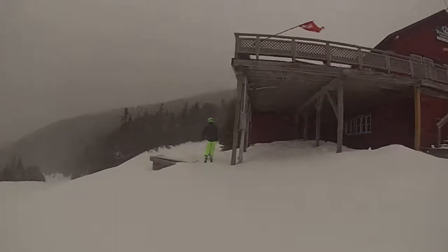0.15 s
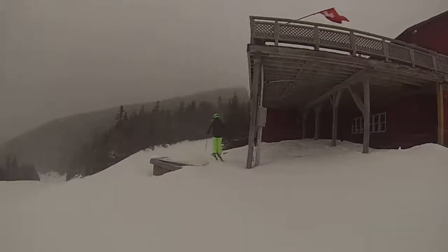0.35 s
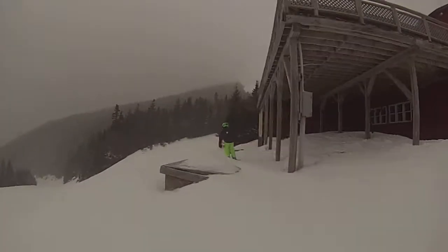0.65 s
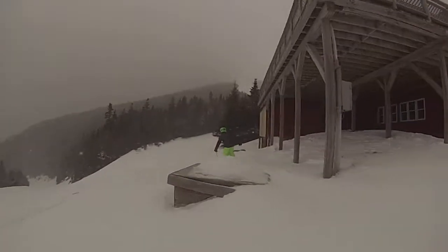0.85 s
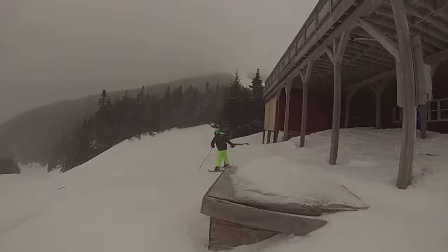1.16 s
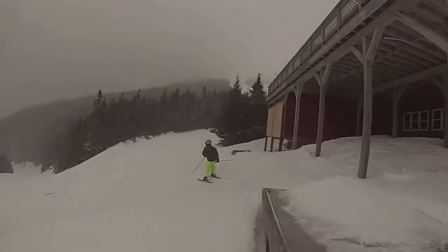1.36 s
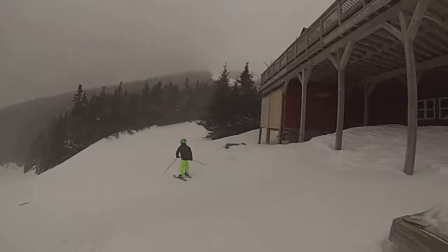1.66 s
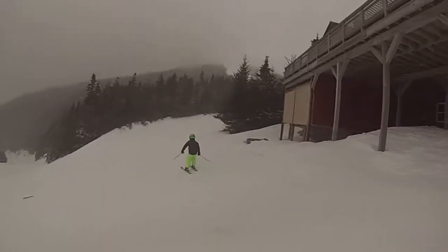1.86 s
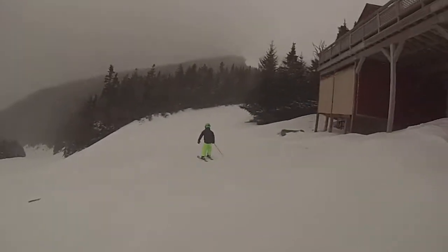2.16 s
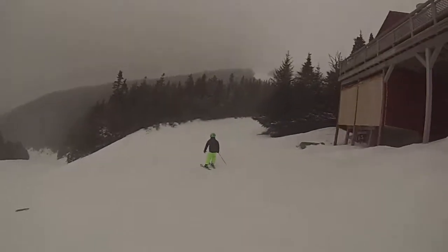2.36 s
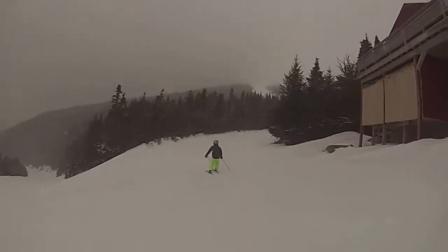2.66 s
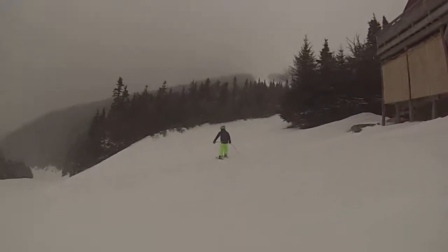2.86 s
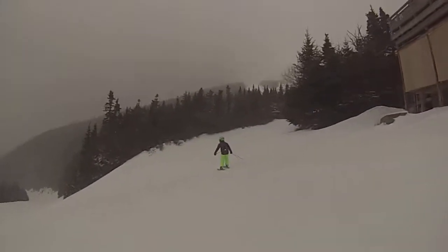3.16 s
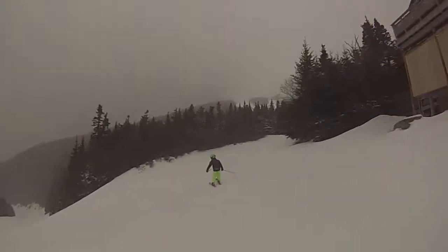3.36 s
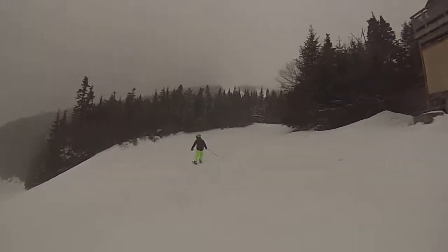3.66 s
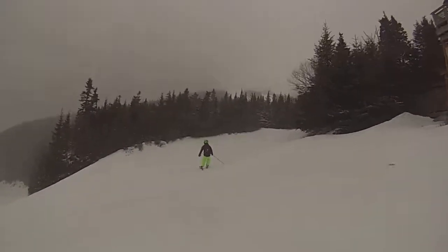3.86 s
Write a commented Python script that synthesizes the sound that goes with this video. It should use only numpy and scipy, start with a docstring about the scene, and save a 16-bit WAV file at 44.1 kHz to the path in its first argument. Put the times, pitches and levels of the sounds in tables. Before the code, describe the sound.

Two coarse ski scrapes on icy snow with crunching lumps and fine spray, separated by a lull, then scattered crisp ticks over soft wind rumble; close, boxy, mono sound from inside a hard case on an open slope.

```python
"""Skis on crusty snow, heard from inside a case

By a lodge, a skier glides past a microphone sealed in a case. Wind rumbles as low tones over shaped noise,
and whistles faintly as a wandering sine. Ice grains tick on the case: clicks ringing short modes.
The skis scrape loudly in two turns: dense random clicks ring the case resonances, with bursts for breaking
lumps of crust, a dull hiss, the singing of a flat glide and a fine bright spray of snow."""
import sys
import numpy as np
from scipy import signal
from scipy.fft import rfft, irfft
from scipy.io import wavfile
from scipy.ndimage import uniform_filter1d

SR = 44100
rng = np.random.default_rng(int(sys.argv[2]) if len(sys.argv) > 2 else 0)


def materialize(psi):
    """Save the field psi as 16-bit PCM at rate SR to the path in sys.argv[1].

    A 1-D psi becomes a single channel; in a 2-D psi each row is a channel.
    """
    bounded = np.clip(np.atleast_2d(psi).T, -1, 1)
    quanta = np.round(bounded * 32767).astype(np.int16)
    wavfile.write(sys.argv[1], SR, quanta)


N = 176400  # 4 s
T = np.arange(N) / SR


def amp(db):
    """dB to gain."""
    return 10 ** (np.asarray(db) / 20)


def rms_one(x):
    """Scale to rms 1."""
    return x / np.sqrt(np.mean(x ** 2) + 1e-20)


def in_time(rows):
    """Columns of a table, after its times, as curves over all samples."""
    s, *columns = np.transpose(rows)
    return [np.interp(T, s, column) for column in columns]


def drift(hz):
    """Slow random wander, rms 1: noise through two equal low-pass poles at hz."""
    r = np.exp(-2 * np.pi * hz / SR)
    noise = rng.standard_normal(N + SR)
    return rms_one(signal.lfilter([1], [1, -2 * r, r * r], noise)[SR:])  # the first second settles the filter


def wavering(hz, waver_hz, rate_hz):
    """A tone of rms 1 whose pitch wanders by waver_hz rms."""
    cycles = np.cumsum(hz + waver_hz * drift(rate_hz)) / SR
    return np.sqrt(2) * np.sin(2 * np.pi * cycles + rng.uniform(0, 2 * np.pi))


def resonate(x, hz, width_hz):
    """One two-pole resonance, gain about 1 at its peak."""
    r = np.exp(-np.pi * width_hz / SR)
    poles = [1, -2 * r * np.cos(2 * np.pi * hz / SR), r * r]
    return signal.lfilter([(1 - r * r) / 2, 0, (r * r - 1) / 2], poles, x + 1e-18)


PATCH_HZ = 45  # corner of the flicker


def case(x, table, patch_db=0):
    """Parallel resonances with alternating signs, each flickering on its own by patch_db rms."""
    out = np.zeros(len(x))
    for k, (hz, width_hz, db) in enumerate(table):
        flicker_db = patch_db * drift(PATCH_HZ) if patch_db else 0
        out += (-1) ** k * amp(db + flicker_db) * resonate(x, hz, width_hz)
    return out


def grains(per_s, spread_db, top=3.6):
    """Random clicks, rms 1 overall; sizes in dB are exponential, capped at top times spread_db."""
    sizes = amp(spread_db * np.minimum(rng.exponential(1, N), top)) * rng.choice([-1, 1], N)
    return rms_one(sizes * (rng.random(N) < per_s / SR))


# colour of the wind rush: f/Hz, relative spectral level/dB
RUSH_COLOUR = [(8, -28), (20, -1.5), (45, -6), (62, -7.5), (80, -16), (110, -19.5), (200, -23.5),
               (340, -30), (570, -31.5), (1100, -38.5), (1450, -44)]
# gusts on the microphone port: t/s, rush level/dB within 115-300 Hz
GUSTS = [(0.0, -59), (0.02, -60.5), (0.63, -64), (0.76, -52), (1.08, -60), (1.16, -53), (1.2, -65.5),
         (1.71, -60.5), (1.74, -63.5), (1.95, -54.5), (2.27, -62), (2.49, -56), (3.11, -57.5),
         (3.25, -59.5), (3.9, -60.5), (4.0, -56)]


def wind_rush():
    """A lumpy rush at the microphone port: noise shaped in frequency, its level following the gusts."""
    (gust_db,) = in_time(GUSTS)
    hz, db = np.transpose(RUSH_COLOUR)
    bins = np.arange(N // 2 + 1) * SR / N
    colour_db = np.interp(np.log(bins + 1), np.log(hz), db, right=-80)
    spectrum = rfft(rng.standard_normal(N)) * amp(colour_db)
    reference_rms = np.std(irfft(spectrum * (bins > 115) * (bins < 300), N))
    return irfft(spectrum, N) / reference_rms * amp(gust_db + drift(13))


# wind buffeting the case: t/s, throb level/dB, hum level/dB
BUFFETS = [(0.0, -51.5, -50), (0.2, -45.5, -85), (0.23, -38, -77), (0.29, -40, -61), (0.44, -40, -71),
           (0.49, -50, -53), (0.59, -33.5, -65), (0.62, -56, -58), (0.8, -32.5, -58), (0.92, -57, -46.5),
           (1.0, -35.5, -49.5), (1.19, -48, -69), (1.26, -52, -55.5), (1.83, -39.5, -62.5),
           (1.94, -35.5, -51.5), (2.32, -50.5, -66), (2.39, -46, -49), (2.47, -42.5, -60), (2.64, -45, -55),
           (2.78, -38, -64.5), (3.03, -59, -44.5), (3.25, -39, -74), (3.29, -65, -70), (3.35, -41, -61),
           (3.68, -54, -64), (3.72, -47, -62), (3.77, -66, -77), (3.8, -68, -71.5), (3.95, -36, -57),
           (4.0, -42, -51)]
THROB_HZ, THROB_WAVER_HZ, HUM_HZ, HUM_WAVER_HZ = 39, 5, 97, 7


def wind_buffeting():
    """Two low tones of wandering pitch and level as wind buffets the case."""
    throb_db, hum_db = in_time(BUFFETS)
    throb = wavering(THROB_HZ, THROB_WAVER_HZ, 5.07) * amp(throb_db + 0.58 * drift(31.0))
    hum = wavering(HUM_HZ, HUM_WAVER_HZ, 8.8) * amp(hum_db + 1.6 * drift(15))
    return throb + hum


# faint wind whistle: t/s, f/Hz, level/dB
WHISTLE = [(2.4, 520, -80), (2.52, 545, -62), (2.7, 580, -61), (2.98, 675, -62), (3.1, 620, -67),
           (3.25, 585, -62.5), (3.42, 540, -64), (3.56, 455, -67), (3.65, 450, -85), (3.85, 560, -80),
           (4.0, 600, -60)]
WHISTLE_WAVER_HZ, WHISTLE_BREATH_HZ = 16, 45  # pitch wander; corner of the breathy level wander


def wind_whistle():
    """A gliding tone, its pitch and level blurred by breath."""
    hz, db = in_time(WHISTLE)
    breath = rms_one(1.6 + drift(WHISTLE_BREATH_HZ))
    return amp(db) * breath * wavering(hz, WHISTLE_WAVER_HZ, 25)


# one short squeak: start t/s, end t/s, f/Hz, level/dB, octave level/dB relative to the fundamental
SQUEAK = (3.312, 3.388, 6420, -63, -18)


def squeak():
    """A thin tone and its octave, faded in and out, with a slightly unsteady pitch."""
    start, end, pitch_hz, level_db, octave_db = SQUEAK
    phase = 2 * np.pi * np.cumsum(pitch_hz + 30 * drift(40)) / SR
    gate = np.clip(np.minimum(T - start, end - T) / 0.0072, 0, 1)  # 7.2 ms fades
    tone = np.sin(phase) + amp(octave_db) * np.sin(2 * phase)
    return np.sqrt(2) * amp(level_db) * gate * tone


# ice grains hitting the case: t/s, strike level/dB (before a common trim),
# low ring level/dB, high ring level/dB (both count relative to their mean over the table)
TICKS = [(0.0769, -26.5, 3.5, -15.5), (0.1026, -36, 1, -7.5), (0.1271, -35, -13, -21),
         (0.3, -29.5, -3, -12), (0.3378, -29.5, -15, -27), (0.383, -45, -1, -3), (1.1467, -37, -1, -19),
         (1.435, -37, -17, -23), (1.622, -48, -20, -8), (1.646, -47, -20, -8), (1.6644, -33.5, 13, -24),
         (1.681, -42, -20, -10), (1.726, -40, -20, -15), (1.749, -54, -20, -8), (1.788, -43, -15, -16),
         (1.816, -50, -20, -8), (1.839, -46, -20, -6), (1.866, -30.5, -17, -20), (1.878, -52, -20, -7),
         (1.844, -30, -12, -15), (1.962, -38, 0, -27), (1.9866, -55, -25, -8), (2.0003, -34, -14, -18),
         (2.013, -38, -15, -18), (2.061, -35, -9, -20), (2.2598, -48, -16, -23), (2.3306, -34, -1, -28),
         (2.44, -39, 0, -11), (3.2166, -37.5, 0, -13), (3.264, -43, -8, -11), (3.2916, -37, -12, -20),
         (3.302, -42, -5.5, -20), (3.3094, -45, 1, -16), (3.3438, -42, -15, -25), (3.4, -44, -7, -19),
         (3.4364, -58, 8, -6), (3.45, -45, -1, -6), (3.469, -36.5, -3.5, -12), (3.5, -46, -1, -24),
         (3.5215, -45, -11, -16), (3.5366, -47, -8, -9), (3.555, -48, -10, -18), (3.587, -45, -5, -19),
         (3.6217, -22.5, -18, -21), (3.6424, -43, -1, -13), (3.6474, -46, 1, -11), (3.6532, -38, -8, -13),
         (3.704, -31.5, -22, -31), (3.711, -43, -13, -18), (3.733, -42, -3, -16), (3.746, -43, -9, -16),
         (3.7602, -47, -5, -20), (3.796, -47, -5, -16), (3.8107, -40, -4, -10), (3.8196, -47, 8, -9),
         (3.8367, -30.5, 0, -25), (3.852, -53, 9.5, -14), (3.8804, -42, 1, -6), (3.894, -35, -2, -20),
         (3.939, -43, -6, -21), (3.965, -47, 3, -13)]
# what a tick rings in the case: f/Hz, level/dB, decay by 60 dB t/s
TICK_MODES = [(1900, -5.5, 0.02), (2530, -1, 0.0063), (3050, -3, 0.0063), (3460, -1, 0.0067),
              (3900, -2, 0.006), (4660, -0.5, 0.0039), (5440, -1.5, 0.0036), (6700, -1.5, 0.0034),
              (8700, -3.5, 0.0013), (11270, -4.5, 0.0024), (13900, -10, 0.0013)]
TICK_TRIM_DB, TICK_LOW_CUT_HZ = -3.0, 1500
TICK_SHATTER_S, TICK_SHATTER_DB = 0.002, -21  # a grain lands, then crumbles: noise decay and level
SMALL_TICKS_PER_S, SMALL_TICK_DB = 80, -57  # level before random spread
SMALL_BRIGHT_DB = 4.5  # extra above 8 kHz


def ice_ticks():
    """Each grain strikes every mode of the case with its own strength; small ones fall at random."""
    s, db, low_db, high_db = np.transpose(TICKS)
    chance = rng.standard_normal((len(s), len(TICK_MODES)))
    small = grains(SMALL_TICKS_PER_S, 2.3, top=2.5)
    small = small * np.sqrt(SMALL_TICKS_PER_S / SR) * amp(SMALL_TICK_DB)  # from overall rms to click size
    low_colour_db = np.minimum(low_db - low_db.mean(), 7)
    high_colour_db = high_db - high_db.mean()
    out, t = np.zeros(N), np.arange(600) / SR
    for k, (hz, level_db, t60) in enumerate(TICK_MODES):
        clicks = small * amp(6.1 * rng.standard_normal(N) + SMALL_BRIGHT_DB * (hz > 8000))
        colour_db = low_colour_db * (hz < 2700) + high_colour_db * (hz > 8000)
        clicks[(s * SR).astype(int)] += amp(db + TICK_TRIM_DB + 1.1 * chance[:, k] + colour_db)
        crumble = amp(TICK_SHATTER_DB) * rng.standard_normal(len(t)) * np.exp(-t / TICK_SHATTER_S)
        clicks = signal.oaconvolve(clicks, crumble + (t == 0))[:N]
        r, w = amp(-60 / (t60 * SR)), 2 * np.pi * hz / SR
        ring = signal.lfilter([0, np.sin(w)], [1, -2 * r * np.cos(w), r * r], clicks + 1e-18)
        out += (-1) ** k * amp(level_db) * ring
    return signal.sosfilt(signal.butter(2, TICK_LOW_CUT_HZ, "high", fs=SR, output="sos"), out)


# fine snow spray: t/s, body level/dB, level/dB of its top above 7 kHz
SPRAY = [(0, -56, -60), (.2, -54, -57.5), (.53, -51.5, -62), (.6, -46.5, -55.5), (.72, -44, -55),
         (.76, -38.5, -53), (.79, -39.5, -47), (.83, -39.5, -47), (.9, -43, -50), (1.0, -40, -49.5),
         (1.2, -42, -52), (1.33, -44.5, -54.5), (1.39, -50, -63), (1.5, -54, -65), (1.58, -47.5, -58),
         (1.68, -47.5, -64), (1.72, -49.5, -68), (1.82, -54.5, -66), (1.98, -57, -64.5),
         (2.15, -56.5, -67.5), (2.32, -55.5, -70), (2.4, -49.5, -66), (2.57, -46, -64), (2.72, -44, -54.5),
         (2.835, -45.5, -58), (2.855, -45, -51.5), (3.05, -40, -48), (3.19, -44.5, -56), (3.24, -63, -76),
         (3.43, -66.5, -68), (3.56, -66.5, -73), (3.62, -58, -65), (3.7, -62.5, -71), (3.9, -75, -74),
         (4, -62, -70)]
# high case resonances, rung by the spray body: f/Hz, width f/Hz, level/dB
CASE_HIGH = [(2700, 330, -6), (3370, 130, -4), (3830, 230, -0.5), (4365, 220, -1), (4766, 205, -2.5),
             (5520, 650, -3.5), (6500, 270, -7), (6990, 200, -9)]
# topmost case resonances, rung by the spray top: f/Hz, width f/Hz, level/dB
CASE_TOP = [(7700, 540, 1.5), (9150, 1540, 1), (10860, 790, -1), (13700, 3800, -4.5)]
SPRAY_PER_S, SPRAY_SPREAD_DB, SPRAY_CHATTER_DB, SPRAY_PATCH_DB = 9000, 2.5, 0.6, 1.96


def snow_spray(chatter):
    """Very dense fine grains ring the upper case resonances and flutter partly with the edge."""
    body_db, top_db = in_time(SPRAY)
    fine = grains(SPRAY_PER_S, SPRAY_SPREAD_DB)
    flutter_db = SPRAY_CHATTER_DB * (chatter + 1.54 * drift(17))
    body = rms_one(case(fine, CASE_HIGH, SPRAY_PATCH_DB)) * amp(body_db + flutter_db)
    top = rms_one(case(fine, CASE_TOP, SPRAY_PATCH_DB)) * amp(top_db + flutter_db + 0.57 * drift(8))
    return body + top


# skis gliding flat: t/s, level/dB before its flicker
GLIDE = [(0, -50.5), (.6, -54), (1.9, -55), (2.3, -61), (3.2, -51.5), (3.5, -62.5), (3.7, -52.5),
         (4, -50.5)]
GLIDE_HZ, GLIDE_WIDTH_HZ = 1957, 235


def flat_glide(noise, bright):
    """Noise singing in one case resonance; breaking lumps add their bright bursts to it."""
    (glide_db,) = in_time(GLIDE)
    singing = rms_one(resonate(noise, GLIDE_HZ, GLIDE_WIDTH_HZ))
    return singing * (amp(glide_db + 3.4 * drift(45)) + bright / 2)


# lumps of crust breaking under a ski: t/s, burst peak level/dB (nominal, into the case),
# length t/s (at least 2 ms is used), upper ring level/dB relative to the burst (halved in the glide)
CRUNCHES = [(0.258, -24.5, 0.0055, -16), (0.566, -21.5, 0.012, -29), (0.688, -29, 0.0031, -13),
            (0.856, -17.5, 0.0095, -10), (1.482, -33, 0.004, -11), (1.769, -28.5, 0.0063, -15),
            (2.33, -31, 0.0037, -4), (2.336, -24.5, 0.0066, 7), (2.382, -26.5, 0.0068, -11),
            (2.3895, -20, 0.0048, 11), (2.397, -24, 0.0079, -8), (2.851, -26.5, 0.0057, -7),
            (2.943, -24, 0.0066, -11), (2.954, -19, 0.0077, -10), (2.99, -21, 0.004, -5),
            (3.0276, -19, 0.013, -13), (3.158, -20.5, 0.0058, -2), (3.2919, -42, 0.0081, 4),
            (3.3045, -31.5, 0.009, -6), (3.311, -34, 0.0046, -8)]
CRUNCH_CREST = 3  # assumed peak over rms of the burst noise
CRUNCH_SNAP_DB = -1  # snap relative to the burst peak


def breaking_lumps():
    """Envelopes of the breaking lumps and of their bright part, and the impulses of the first snaps."""
    lumps, bright, snaps = np.zeros((3, N))
    for s, db, length, bright_db in CRUNCHES:
        age = np.clip((T - s) / max(length, .002), 0, 30)
        burst = amp(db) * np.minimum(8 * age, 1) * np.exp(-age ** 2) / CRUNCH_CREST
        snaps[int(s * SR)] = amp(db + CRUNCH_SNAP_DB)
        lumps += burst
        bright += burst * amp(bright_db)
    return lumps, bright, snaps


CHATTER_HZ = 41  # corner of the edge's shaking


def edge_chatter():
    """Random shaking of the edge, rms 1, with its slow sway over 1/8 s removed."""
    shake = drift(CHATTER_HZ)
    return rms_one(shake - uniform_filter1d(shake, size=SR // 8))


# edges biting the snow: t/s, scrape level/dB before chatter and flicker
EDGE = [(0, -43.5), (.22, -43.5), (.3, -39), (.5, -43), (.62, -36.5), (.78, -32.5), (.9, -27.5),
        (1.15, -26.5), (1.33, -29), (1.39, -37), (1.65, -40.5), (1.8, -43.5), (1.95, -45.5), (2.1, -46.5),
        (2.3, -50), (2.37, -43.5), (2.41, -38.5), (2.56, -32), (2.7, -34), (2.83, -37), (2.95, -32.5),
        (3.18, -31.5), (3.23, -49.5), (3.3, -53), (3.55, -53), (3.62, -51.5), (3.75, -53.5), (4, -51.5)]
# dull hiss through the skis: f/Hz, width f/Hz, level/dB
BOARD = [(497, 1030, -4.5), (1060, 220, -3)]
BOARD_DB = -20  # relative to the scrape


def board_hiss():
    """Noise through two broad low resonances, following the scrape level."""
    (scrape_db,) = in_time(EDGE)
    return rms_one(case(rng.standard_normal(N), BOARD)) * amp(scrape_db + BOARD_DB)


# low case resonances, rung by the scrape: f/Hz, width f/Hz, level/dB
CASE_LOW = [(1238, 420, -9.5), (1531.5, 114.6, 5.5), (1768, 200, -5), (2026, 523, -5.5), (2465, 190, -10.5)]
GRAINS_PER_S, GRAIN_SPREAD_DB, CHATTER_DB, SCRAPE_PATCH_DB = 2400, 2, 1, 0.7
SNAP_S = .0004  # contact time of the snap


def edge_scrape(chatter, noise, lumps, snaps):
    """Grains crushed under the chattering edge, lumps and snaps, all ringing the low case resonances."""
    (scrape_db,) = in_time(EDGE)
    crushed = grains(GRAINS_PER_S, GRAIN_SPREAD_DB)
    to_rms_one = 1 / np.std(case(crushed, CASE_LOW))
    push = crushed * amp(scrape_db + CHATTER_DB * chatter) + noise * lumps
    scrape = to_rms_one * case(push, CASE_LOW, SCRAPE_PATCH_DB)
    knock = case(np.pad(np.hanning(SNAP_S * SR), (0, 600)), CASE_LOW)
    return scrape + signal.oaconvolve(snaps, knock / np.abs(knock).max())[:N]


def skis():
    """All snow sounds of the skis; scrape and spray share the chatter, scrape and glide the noise."""
    chatter = edge_chatter()
    noise = rng.choice([-1, 1], N) * np.sqrt(rng.exponential(1, N))
    lumps, bright, snaps = breaking_lumps()
    upper = snow_spray(chatter) + flat_glide(noise, bright)
    return upper + board_hiss() + edge_scrape(chatter, noise, lumps, snaps)


def scene():
    """All sources at the microphone, mono."""
    wind = wind_rush() + wind_buffeting() + wind_whistle()
    return (wind + squeak() + ice_ticks() + skis())[None]


# where the case swallows sound: f/Hz, width f/Hz, depth 0-1
CASE_DIPS = [(5950, 160, 0.9), (7740, 220, 0.4), (9920, 770, 0.77), (12260, 1300, 0.54)]
PEAK_LIMIT = .24  # full scale = 1
TOP_FADE_HZ, CUTOFF_HZ = 14500, 15950  # gentler fade, then steep stop


def record(dry):
    """The case swallows a few bands, peaks are rounded, the top is cut."""
    for hz, width_hz, depth in CASE_DIPS:
        dry = dry - depth * resonate(dry, hz, width_hz)
    dry = PEAK_LIMIT * np.tanh(dry / PEAK_LIMIT)
    dry = signal.sosfilt(signal.butter(6, TOP_FADE_HZ, fs=SR, output="sos"), dry)
    return signal.sosfilt(signal.cheby2(16, 60, CUTOFF_HZ, fs=SR, output="sos"), dry)


dry = scene()
out = record(dry)
materialize(out)
```